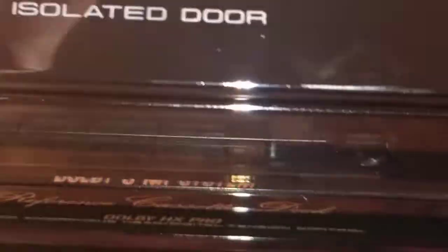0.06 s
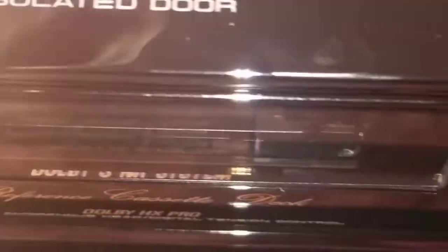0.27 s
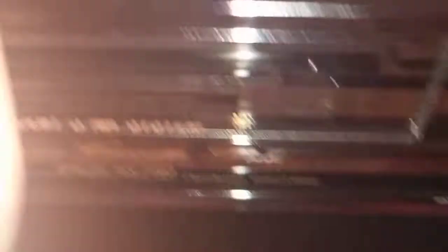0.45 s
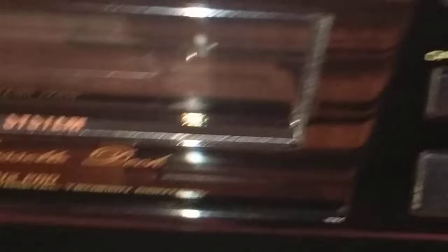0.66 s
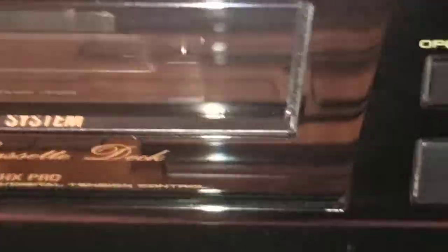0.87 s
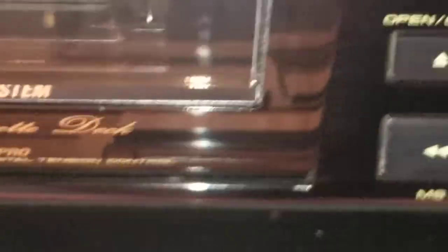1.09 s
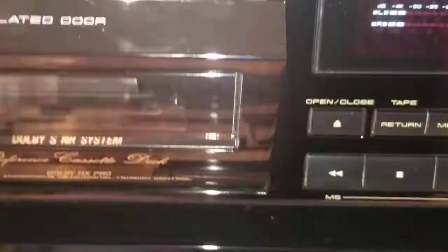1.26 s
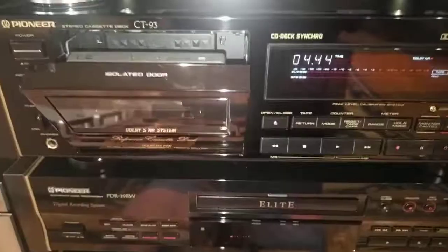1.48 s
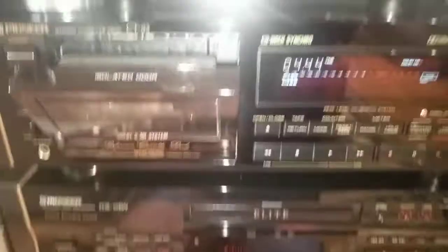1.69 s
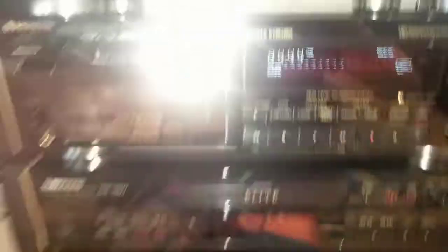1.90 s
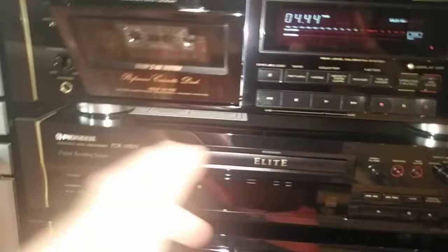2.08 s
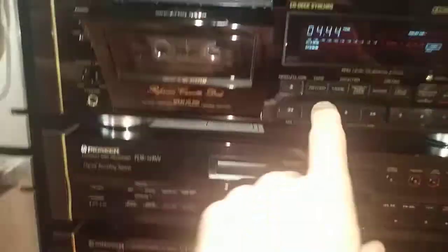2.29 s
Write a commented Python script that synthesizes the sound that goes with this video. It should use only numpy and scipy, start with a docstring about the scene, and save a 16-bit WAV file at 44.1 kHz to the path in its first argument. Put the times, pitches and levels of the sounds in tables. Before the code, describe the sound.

A cassette deck mechanism clunks sharply, followed by small taps and a soft rising whir.

```python
"""In a quiet room, a hand's width from a cassette deck, its mechanism is heard over a faint hum.
A part slides with rising friction noise, strikes home with a clunk and rattles to rest;
the impacts excite the modes of latch and chassis, and the room reverberates.
Small taps and rubs of handling follow, then an airy whir of friction in resonances swells."""
import sys
import numpy as np
from scipy import signal
from scipy.fft import rfft, irfft, next_fast_len
from scipy.io import wavfile
from scipy.ndimage import uniform_filter1d

SR = 44100
rng = np.random.default_rng(int(sys.argv[2]) if len(sys.argv) > 2 else 0)


def transcribe(signal):
    """Save signal, clipped to [-1, 1], as a 16-bit WAV file at the path in sys.argv[1]."""
    frames = np.atleast_2d(signal).T
    limited = np.clip(frames, -1, 1)
    pcm = np.round(limited * 32767).astype(np.int16)
    wavfile.write(sys.argv[1], SR, pcm)


N = 108045
t = np.arange(N) / SR

# Gain of the part that differs between left and right (frequency [Hz], gain [dB])
SIDE_GAIN = [(30, -11.5), (110, 7.5), (300, -0.5), (600, -12.5), (1300, -11), (2400, -7), (4400, 1),
             (8000, 0), (15000, 1)]
# Spectrum of the room air (frequency [Hz], relative level [dB])
AIR_SPECTRUM = [(12, -4.5), (28, 3), (55, -10.5), (110, -16.5), (170, -20), (330, -23), (1100, -25),
                (1540, -22), (1950, -27), (2750, -25), (3500, -32.5), (4800, -33.5), (5600, -37),
                (7000, -39), (7900, -36), (8800, -41), (10000, -38), (11000, -41), (15500, -41.5)]
# Response of the deck's body (frequency [Hz], gain [dB])
BODY_RESPONSE = [(40, -36.5), (130, -27), (280, -15.5), (480, -23.5), (620, -2), (830, -9), (1030, 2.5),
                 (1150, -7.5), (1370, 3), (1600, -2), (1930, -1), (2200, -13.5), (2550, -4), (3500, -7.5),
                 (4700, -10), (5600, -10), (7000, -11.5), (7750, -6.5), (8900, -21.5), (10000, -16.5),
                 (11000, -25), (14700, -27.5), (15800, -36)]
# Resonances of the scrape (frequency [Hz], half bandwidth [Hz], gain [dB])
SCRAPE_BANDS = [(2650, 400, -8), (4160, 450, -1), (6870, 350, -7)]
# Blows of the mechanism (time [s], level [dB], tilt above 1 kHz [dB/octave], left minus right [dB])
IMPACTS = [(0.145, -45, -5.5, 0), (0.1945, -32, 2.5, 1.5), (0.199, -33, 1.5, 0),
           (0.2052, -32.5, -1.5, -2.5), (0.2187, -17.5, 2, 0), (0.2208, -15, 1.5, 0.5),
           (0.2236, -18.5, -1, -2), (0.2293, -18, -4.5, -3), (0.2400, -26.5, 0, -1),
           (0.2506, -21, -2.5, -0.5), (0.2646, -21.5, 0.5, 0), (0.2720, -31, -8.5, 4),
           (0.2812, -31, -1.5, 1)]
# Chassis modes (frequency [Hz], relative level [dB], T60 [s])
CHASSIS_MODES = [(606, -1.5, .17), (1022, 0, 0.22), (1063, -2, .16), (1307, -5, .15), (1337, -2.5, 0.19),
                 (1403, 1, 0.27), (1460, 0, 0.15), (1602, -6.5, .2), (1775, -7.5, 0.11), (1909, -5.5, 0.39),
                 (1940, -3.5, 0.14), (2487, -14, .26), (2800, -6.5, 0.3815), (5100, -18, .2),
                 (7666, -10.5, .12)]
# Latch modes (frequency [Hz], level [dB], T60 [s])
LATCH_MODES = [(1323, -27, 0.041), (2505, -20.5, 0.041), (3970, -19, 0.02), (4530, -14, 0.023),
               (5034, -12, .036), (7570, -22.5, .025), (9880, -25, .022)]
# Reverberation of the room (band centre [Hz], T60 [s], gain [dB])
ROOM_BANDS = [(125.3, .55, -12), (250, .5, 0), (487.7, .42, -5), (1000, 0.96, -21.5), (2316, 0.58, -7.5),
              (4000, .44, -15), (8000, .32, -17), (14000, 0.37, -14)]
# Rubs and rumble of handling (time [s], duration [s], level [dB], band centre [Hz])
HANDLING_RUBS = [(0.798, .17, -72, 1613), (1.159, 0.045, -63, 1850), (1.208, 0.14, -69, 1520),
                 (1.473, 0.012, -60, 2105), (1.495, 0.16, -67.5, 2060), (1.715, .09, -59.5, 33.1)]
# Taps on the casing
# (time [s], ring level [dB], ring frequency [Hz], ring T60 [s], crack level [dB], thump level [dB])
CASING_TAPS = [(1.0799, -31, 1537, 0.0094, -34, -26.5), (1.561, -58, 350, .012, -66, -39.5),
               (1.594, -33, 710, 0.0032, -47, -45), (2.1487, -38.5, 1440, 0.013, -48, -61)]
# Spectrum of a tap's crack (frequency [Hz], relative level [dB])
TAP_SPECTRUM = [(300, -0.5), (1200, -2.5), (2800, 6.5), (3600, -13), (5000, -9), (8000, -11.5),
                (12000, -22)]
# Swell of the whir (time [s], level [dB])
WHIR_SWELL = [(1.7, -76), (1.82, -63.5), (1.89, -56), (2.0, -53), (2.13, -52), (2.23, -51.5), (2.33, -49.5),
              (2.45, -46)]
# Resonances of the whir
# (early frequency [Hz], late frequency [Hz], bandwidth [Hz], early gain [dB], late gain [dB])
WHIR_BANDS = [(450, 470, 480, -9, -4.5), (1500, 1400, 570, 1, -4.5), (2050, 1910, 900, -1.5, 0.5),
              (2780, 2790, 980, -0.5, 3.5), (4083, 4150, 890, -0.5, -1.5), (4550, 4570, 650, -14.5, 1),
              (6100, 6210, 330, -20, -7.5), (7750, 7800, 605, -18, -9.5), (9600, 9950, 1500, -24.5, -20),
              (12000, 12200, 5000, -35.5, -23.5)]

CONTACT_S = 0.00027  # rise time of an impact


def undb(db):
    """Amplitude ratio of a level in decibels."""
    return 10 ** (np.asarray(db) / 20)


def unit(x):
    """Normalisation to an rms of 1."""
    return x / np.sqrt(np.mean(x ** 2))


def convolve(x, response):
    """Convolution with an impulse response, cut to the input's length."""
    n = next_fast_len(x.shape[-1] + response.shape[-1], True)
    return irfft(rfft(x, n) * rfft(response, n), n)[..., :x.shape[-1]]


def place(start, x):
    """Delay of a short sound to its start time."""
    out, i = np.zeros(x.shape[:-1] + (N,)), int(start * SR)
    out[..., i:i + x.shape[-1]] = x[..., :N - i]
    return out


def colour(x, points):
    """Minimum-phase filtering through points of (frequency [Hz], gain [dB])."""
    size = 2 ** 13
    hz, db = np.array(points, float).T
    gain_db = np.interp(np.log(np.fft.rfftfreq(size, 1 / SR) + 1), np.log(hz), db)
    cepstrum = irfft(np.log(undb(gain_db)))
    cepstrum[1:size // 2] *= 2
    cepstrum[size // 2 + 1:] = 0
    return convolve(x, irfft(np.exp(rfft(cepstrum))))


def band(x, hz, width):
    """Resonance: two equal resonators in cascade pass a steep-sided band."""
    b, a = signal.iirpeak(min(hz, .45 * SR), max(hz / width, .7), fs=SR)
    return signal.lfilter(b, a, signal.lfilter(b, a, x))


def stereo(mid, side):
    """Coherence: left and right are alike in the middle range, unrelated in the treble."""
    return mid + colour(side, SIDE_GAIN) * np.array([[1], [-1]])


def noise(length=N):
    """Partly coherent stereo Gaussian noise."""
    return unit(stereo(*rng.standard_normal((2, length))))


def pan(db):
    """Level difference, left minus right, as two gains."""
    return undb(np.array([[db], [-db]]) / 2)


def fade(start, t60):
    """Exponential decay from a sudden onset."""
    return (t >= start) * np.exp(-np.log(1000) * np.clip((t - start) / t60, 0, 10))


def ring(start, hz, t60, phase=0):
    """Free vibration of one damped mode."""
    age = t[:int(min(1.5 * t60 * SR, N - start * SR - 1))]
    return place(start, undb(-60 * age / t60) * np.sin(2 * np.pi * hz * age + phase))


def gate(start, end, attack, fall):
    """Envelope with linear attack, hold and exponential release."""
    return np.clip((t - start) / attack, 0, 1) * np.exp(-np.clip((t - end) / fall, 0, 20))


def wander(per_s):
    """Slow random modulation with an rms of 1."""
    step = int(SR / per_s)
    return unit(uniform_filter1d(np.repeat(rng.standard_normal(N // step + 1), step), step)[:N])


def grains(per_s, spread_db):
    """Shot noise: dense tiny contacts of uneven size."""
    hits = (rng.random(N) < per_s / SR) * undb(spread_db * rng.standard_normal(N))
    return stereo(*(hits * rng.choice([-1, 1], (2, N))))


def background():
    """Ambient noise: broadband room air and rumble lie under the deck's wavering hum."""
    hum_hz = 201
    air = unit(colour(noise(), AIR_SPECTRUM))
    hum = unit(np.sin(2 * np.pi * hum_hz * t) * undb(1.5 * wander(per_s=7.1)))
    return undb(-60.5) * air + undb(-75.5) * hum


def slide():
    """Sliding friction: contact noise grows as the part gathers speed, with a thin scrape on the way."""
    end_s, rise_db_per_s = 0.2135, 191
    scrape_span_s = (.16, .19)
    swell = undb(-41.5 + rise_db_per_s * np.minimum(t - end_s, 0)) * gate(0, end_s, .01, .012)
    scrape = unit(sum(undb(db) * band(grains(4300, spread_db=3), hz, 2 * half_width)
                      for hz, half_width, db in SCRAPE_BANDS))
    dip = undb(-5 * gate(*scrape_span_s, attack=.004, fall=.003))
    friction = unit(colour(grains(5000, spread_db=-0.5), BODY_RESPONSE))
    return swell * dip * friction + undb(-45) * scrape * gate(*scrape_span_s, attack=.015, fall=.008)


def blows():
    """Impact excitation: each blow is a short crack in the deck's body and an impulse to the chassis."""
    crack_t60_s, ring_db_per_db = 0.04, 1.7
    age = t[:4096]
    envelope = undb(-60 * age / crack_t60_s) * np.clip(age / CONTACT_S, 0, 1)
    hardest_db = max(row[1] for row in IMPACTS)
    cracks, impulses = 0, np.zeros(N)
    for start, db, tilt_db, pan_db in IMPACTS:
        tilted = [(hz, gain + tilt_db * np.log2(max(hz / 1000, 1))) for hz, gain in BODY_RESPONSE]
        crack = unit(colour(noise(len(age)), tilted))
        cracks = cracks + place(start, undb(db) * pan(pan_db) * crack * envelope)
        impulses[int(start * SR)] += undb(ring_db_per_db * (db - hardest_db)) * rng.choice([-1, 1])
    return cracks + chassis(impulses)


def chassis(impulses):
    """Modal superposition: every impulse rings the same set of damped modes."""
    mid, side = [sum(undb(db) * ring(0, hz, t60, 2 * np.pi * rng.random())
                     for hz, db, t60 in CHASSIS_MODES) for _ in range(2)]
    return undb(-35.5) * convolve(stereo(mid, side), impulses)


def latch():
    """Damped free vibration: the latch rings briefly as it strikes home, a little to the left."""
    strike_s = .2208
    modes = sum(undb(db) * ring(strike_s, hz, t60, rng.random((2, 1))) for hz, db, t60 in LATCH_MODES)
    return modes * pan(db=5.5) * np.clip((t - strike_s) / CONTACT_S, 0, 1)


def rattle():
    """Random impacts: loose parts chatter against the body and settle."""
    chatter = unit(colour(grains(1800, spread_db=2), BODY_RESPONSE))
    return undb(-36) * chatter * gate(start=.226, end=.2805, attack=.0013, fall=.019)


def room(x):
    """Reverberation: a diffuse tail decays at its own rate in each band, fastest in the high treble."""
    age, tail = t[:SR // 2 + SR // 4], 0
    for hz, t60, db in ROOM_BANDS:
        decay = undb(-60 * age / t60) * np.clip(age / .015, 0, 1)
        tail = tail + undb(db) * band(noise(len(age)), hz, width=hz) * decay / np.linalg.norm(decay)
    return convolve(x, tail)


def rubs(hiss):
    """Friction noise: handling makes soft band-limited rubs and a low rumble."""
    out = 0
    for start, duration, db, hz in HANDLING_RUBS:
        envelope = gate(start, start + duration, attack=.0041, fall=.011)
        out = out + undb(db) * unit(band(hiss, hz, width=.78 * hz)) * envelope
    return out


def taps(hiss):
    """Transient response: a tap on the casing gives two heavily damped modes, a crack and a thump."""
    overtone_ratio = 1.62
    out, crack_noise = 0, unit(colour(hiss, TAP_SPECTRUM))
    for start, db, hz, t60, crack_db, thump_db in CASING_TAPS:
        modes = ring(start, hz, t60) - undb(-4) * ring(start, hz * overtone_ratio, t60 / 2)
        crack = crack_noise * fade(start, t60=.0043)
        thump = ring(start, hz=55.9, t60=.021)
        out = out - undb(db) * modes - undb(crack_db) * crack - undb(thump_db) * thump
    return out


def whir():
    """Forced resonance: fine friction drives flickering bands that swell, shift and brighten."""
    shift_s, shift_span_s, flicker_db, right_lag_s = 2.19, 0.087, 1.75, .000065
    late_share = (1 + np.tanh((t - shift_s) / shift_span_s)) / 2
    early_friction, late_friction = grains(9000, spread_db=2), grains(9000, spread_db=3)
    early, late = 0, 0
    for early_hz, late_hz, width, early_db, late_db in WHIR_BANDS:
        flicker = undb(flicker_db * wander(per_s=35))
        offset = rng.integers(N)  # decorrelates the bands
        early += undb(early_db) * flicker * band(np.roll(early_friction, offset, axis=1), early_hz, width)
        late += undb(late_db) * flicker * band(np.roll(late_friction, offset, axis=1), late_hz, width)
    left, right = unit(np.sqrt(1 - late_share) * early + np.sqrt(late_share) * late)
    times, levels = np.array(WHIR_SWELL).T
    swell = undb(np.interp(t, times, levels)) * np.clip(t / times[0], 0, 1)
    # Coming from the left, the sound reaches the right later and weaker.
    return np.array([left, np.roll(right, round(right_lag_s * SR))]) * swell * pan(db=1.5)


def scene():
    """Superposition: the mechanism and its reverberation add to handling, whir and background."""
    mechanism = blows() + latch() + slide() + rattle()
    reverberation = room(mechanism)
    hiss = noise()
    return mechanism + reverberation + rubs(hiss) + taps(hiss) + whir() + background()


def record(dry):
    """Band limiting: a steep elliptic low-pass removes the highest treble."""
    cutoff_hz = 15900
    return signal.sosfilt(signal.ellip(10, .2, 70, cutoff_hz, fs=SR, output="sos"), dry)


dry = scene()
out = record(dry)
transcribe(out)
```